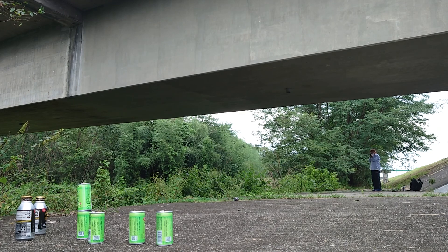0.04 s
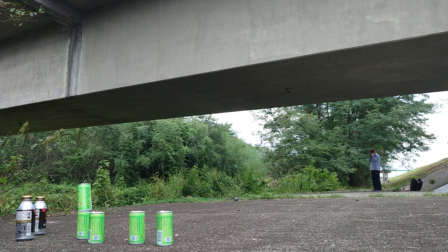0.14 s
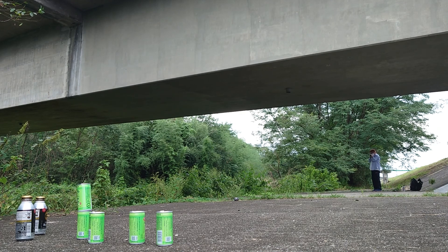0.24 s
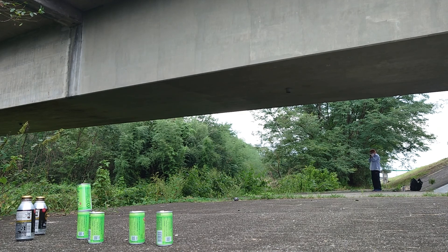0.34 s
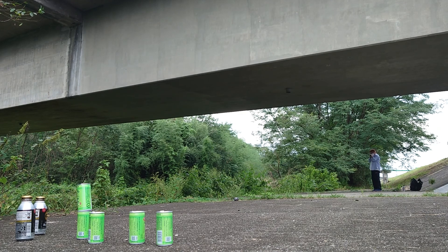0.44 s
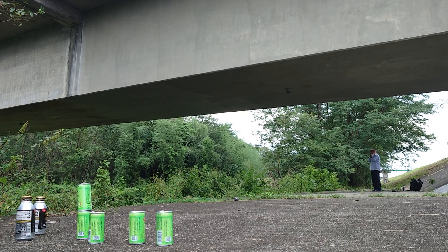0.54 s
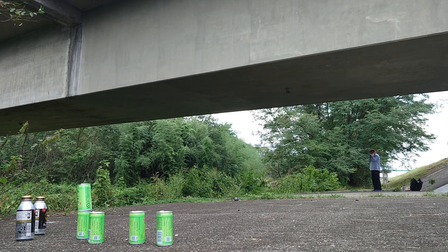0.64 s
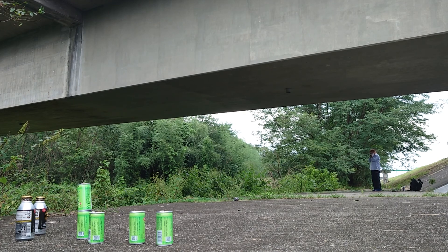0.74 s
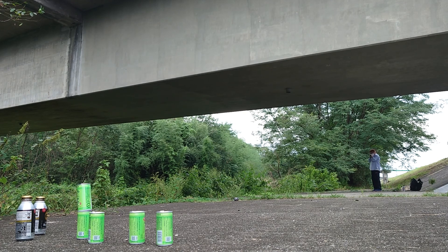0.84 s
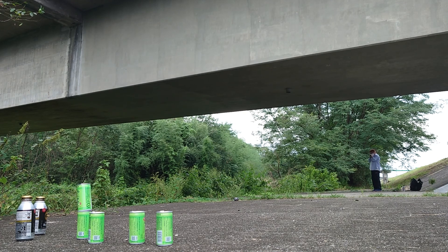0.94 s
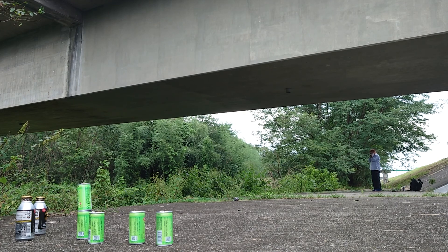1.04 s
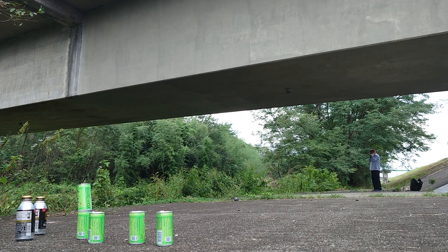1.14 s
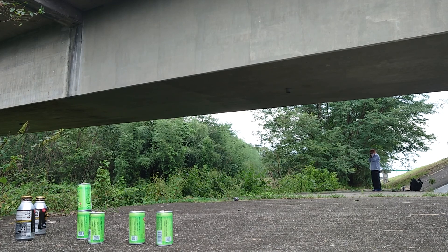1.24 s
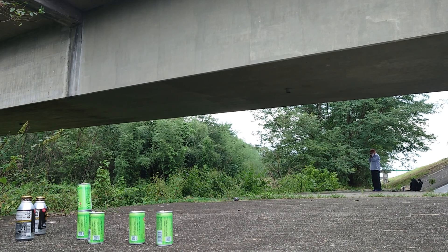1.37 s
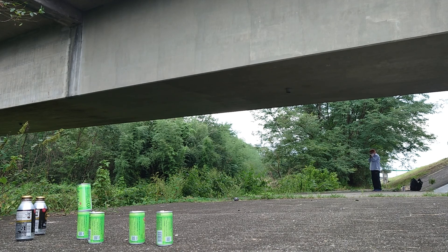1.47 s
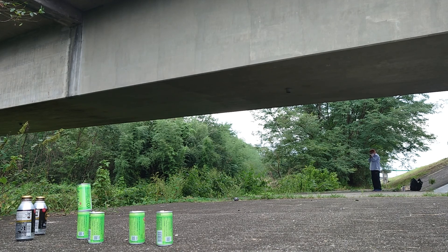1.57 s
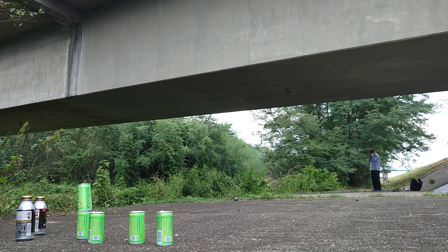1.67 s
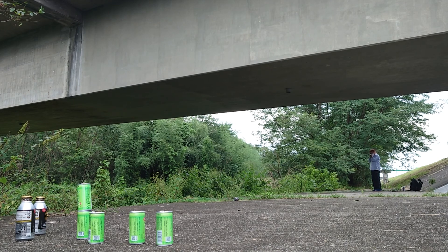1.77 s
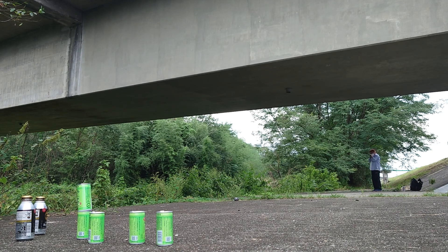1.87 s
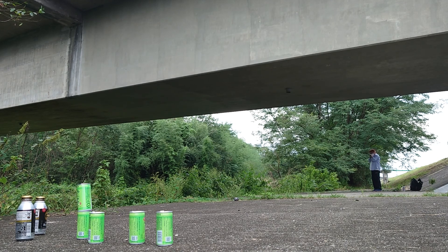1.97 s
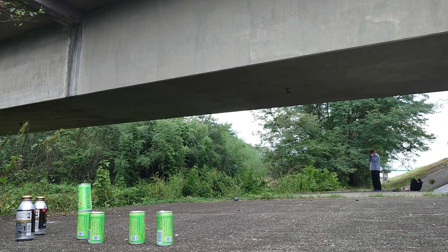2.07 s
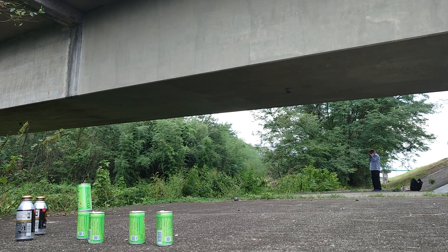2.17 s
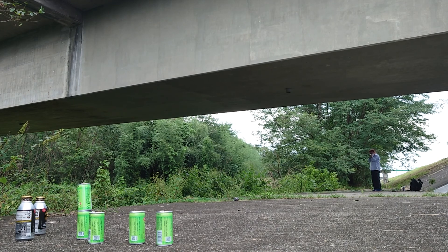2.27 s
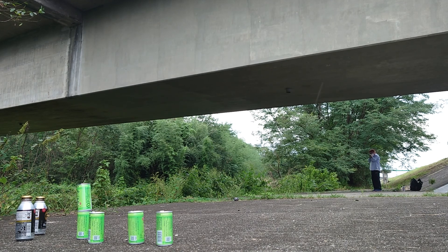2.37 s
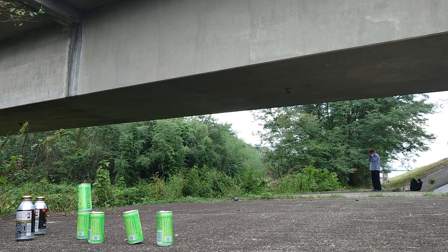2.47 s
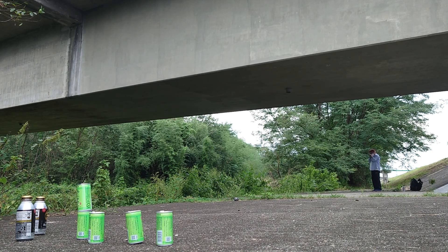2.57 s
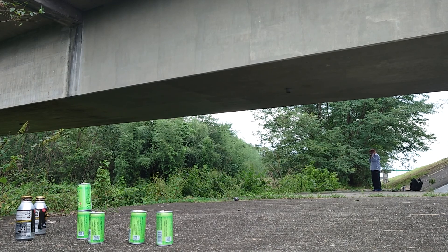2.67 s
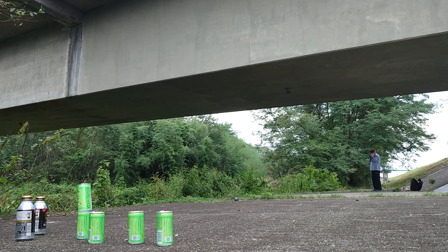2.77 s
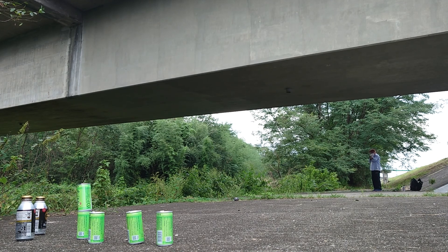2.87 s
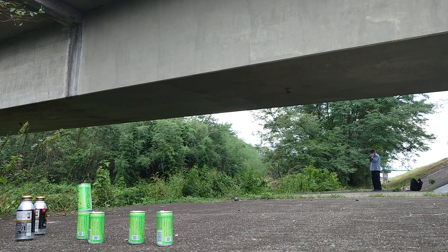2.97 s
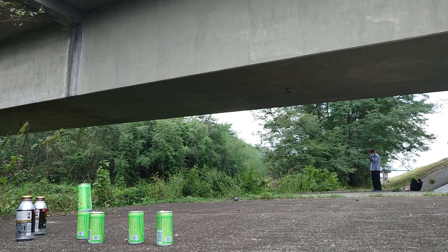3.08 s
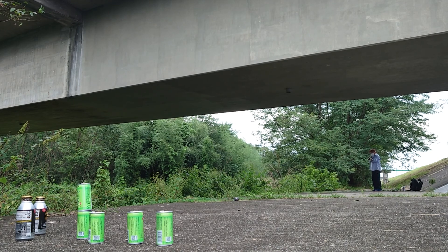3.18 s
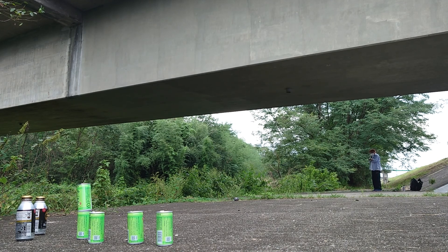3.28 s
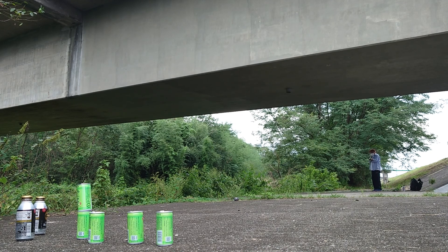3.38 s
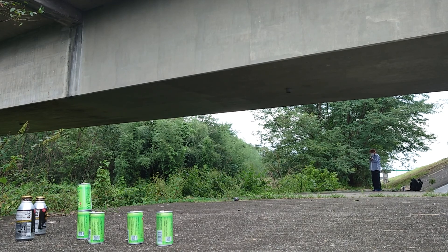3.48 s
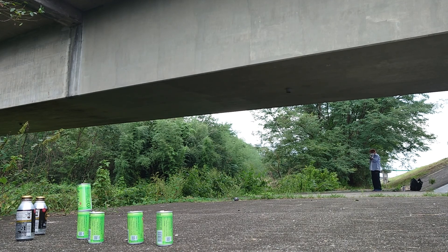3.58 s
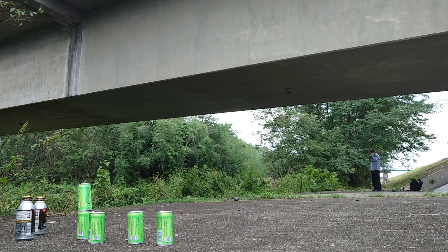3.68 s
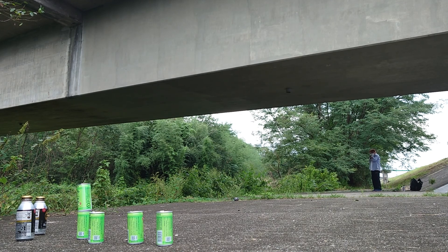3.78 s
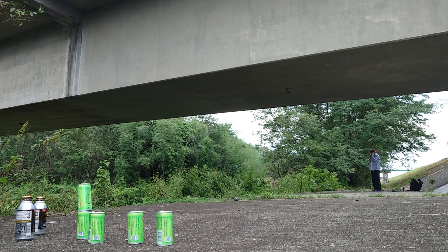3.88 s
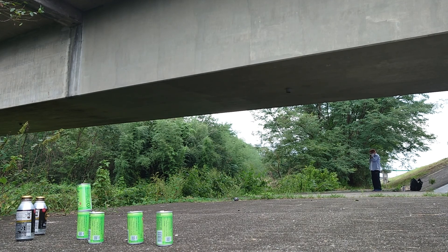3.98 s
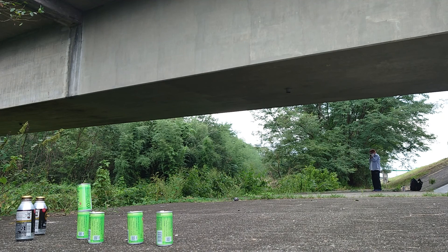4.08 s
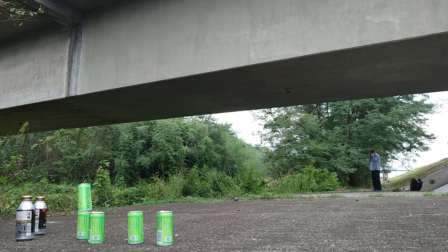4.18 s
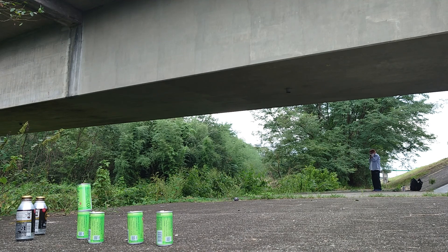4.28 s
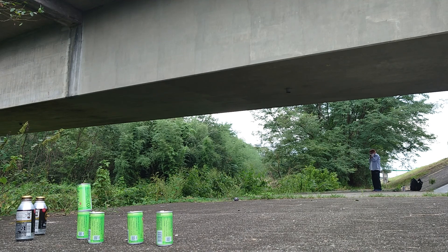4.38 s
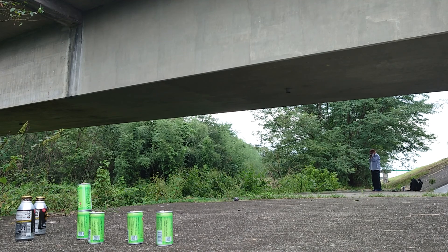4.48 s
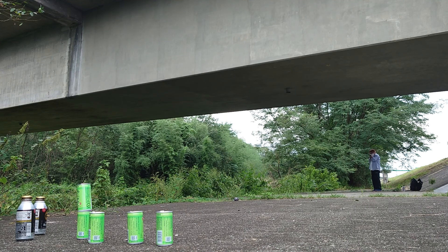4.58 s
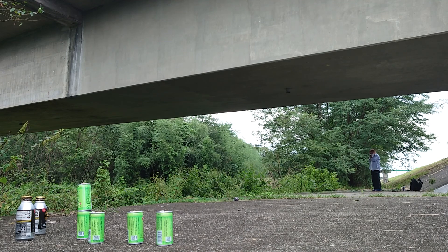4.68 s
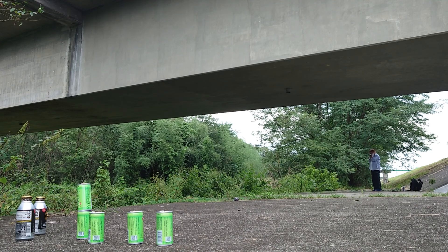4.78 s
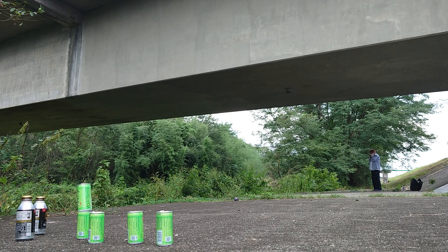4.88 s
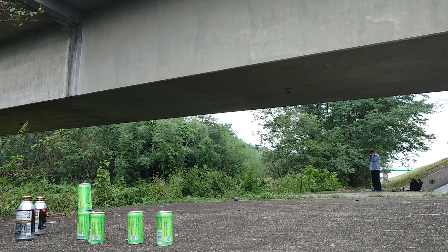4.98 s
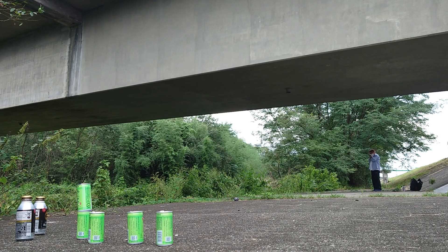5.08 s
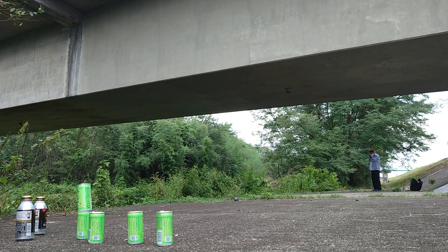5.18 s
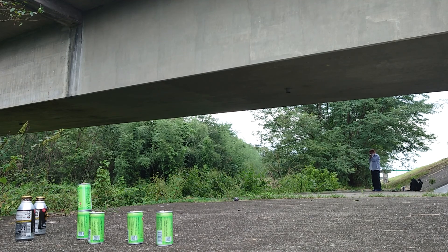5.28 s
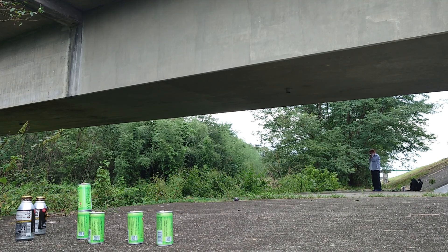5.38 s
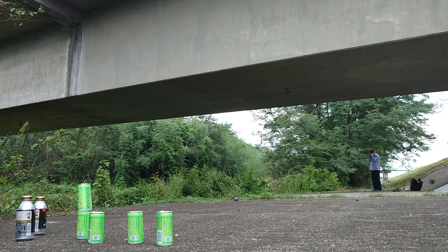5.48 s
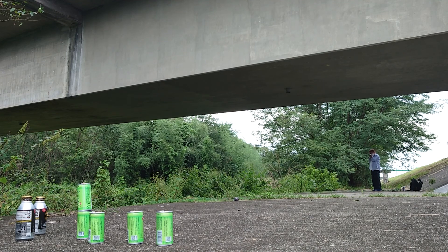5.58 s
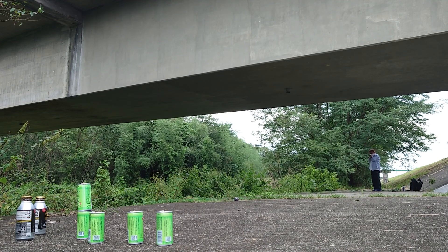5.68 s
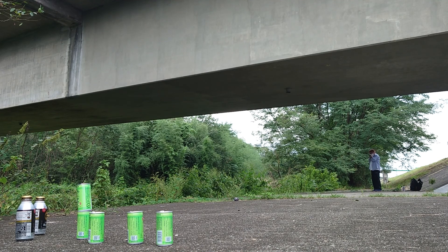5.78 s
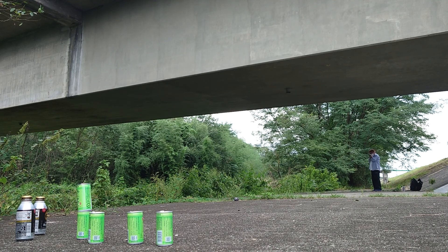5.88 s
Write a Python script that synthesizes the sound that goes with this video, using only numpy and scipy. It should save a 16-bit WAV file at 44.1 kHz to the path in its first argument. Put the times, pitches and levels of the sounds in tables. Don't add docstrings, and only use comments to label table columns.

```python
import sys
import numpy as np
from scipy import signal
from scipy.fft import rfft, irfft
from scipy.io import wavfile
from scipy.ndimage import uniform_filter1d

SR = 44100
rng = np.random.default_rng(int(sys.argv[2]) if len(sys.argv) > 2 else 0)


def persist_wave(psi):
    counts = np.round(np.clip(psi, -1, 1) * 32767).astype(np.int16)
    wavfile.write(sys.argv[1], SR, np.atleast_2d(counts).T)


def volts_from_db(level):
    exponent = np.asarray(level, float) / 20
    return 10 ** exponent


N = 261513

# [t/s, peak level/dB]
STRIKE = (2.4848, -2.5)
# [t/s, peak level/dB, then air column, oval and high modes against it/dB]
KNOCKS = [(2.7355, -23, -14, -12.5, -8.5), (2.7561, -22.5, -16, -14.5, -18), (2.768, -21, -11.5, -25, -7.5),
          (2.781, -23, -16.5, -20, -11.5), (2.847, -39.5, -12, -12, -23), (2.8944, -35, -9.5, -7.5, -9.5),
          (2.9878, -47.5, -6, -5, -12), (3.033, -46, -12, -10, -29), (3.0539, -34.5, -12, -5, -11),
          (3.064, -41, 0, -3.5, -10), (3.1155, -43.5, -5.5, -2, -23), (3.132, -38, -6, -7, -8),
          (3.183, -31.5, -10, -21, -12), (3.187, -30.5, -16, -2.5, -21), (3.199, -34, -7.5, -5, -12),
          (3.2535, -38, -3.5, -5, -10), (3.259, -35, -3.5, -15, -2.5), (3.3128, -42.5, -14, 2.5, -12),
          (3.331, -47.5, -8, 3, -1)]


def noise(size=N):
    return rng.standard_normal(size)


def unit(x):
    return x / np.sqrt(np.mean(x ** 2))


def colour(x, table, lo_hz=0.33, hi_hz=21600.0):
    size = 4096
    f = np.maximum(np.fft.rfftfreq(size, 1 / SR), 1)
    points_hz, points_db = np.transpose(table)
    db = np.interp(np.log(f), np.log(points_hz), points_db)
    db = db - 5 * np.log2(1 + (lo_hz / f) ** 8) - 5 * np.log2(1 + (f / hi_hz) ** 8)
    cep = irfft(np.maximum(db, -90) * np.log(10) / 20)
    cep[1:size // 2] *= 2
    cep[size // 2 + 1:] = 0
    return signal.fftconvolve(x, irfft(np.exp(rfft(cep))))[:len(x)]


def band(x, hz, width):
    edges = [hz - width / 2, hz + width / 2]
    return signal.sosfilt(signal.butter(2, edges, "band", fs=SR, output="sos"), x)


def walk(rate):
    k = int(SR / rate)
    held = np.repeat(noise(N // k + 1), k)
    return 1.3 * uniform_filter1d(uniform_filter1d(held, k), k)[:N]


def fade(t60, seconds):
    return 10 ** (-3 * np.arange(int(seconds * SR)) / SR / t60)


def onset(size, tau):
    return 1 - np.exp(-np.arange(size) / SR / tau)


def add(out, x, at):
    i = int(at * SR)
    out[..., i:i + x.shape[-1]] += x[..., :out.shape[-1] - i]


def pair(make, alike, left_late):
    shared = make()
    both = np.array([np.roll(shared, left_late), shared])
    return np.sqrt(alike) * both + np.sqrt(1 - alike) * np.array([make(), make()])


def delayed(x, samples):
    return np.r_[np.zeros(samples), x[:-samples]]


def ring(hz, t60, seconds, choke_s=9., choke_t60=.03, since=0.):
    t = np.arange(int(seconds * SR)) / SR
    damp = t / t60 + np.maximum(t - choke_s, 0) / choke_t60
    return np.sin(2 * np.pi * hz * (t + since)) * 10 ** (-3 * damp)


def gun():
    # [t/s, peak level/dB, tail level/dB, air burst level/dB]
    shots = [
        (2.277, -11.5, -16.5, -13),
        (3.76, -30, -12.5, -4),
    ]
    # [f/Hz, level per Hz/dB]
    shot_colour = [(88, -54), (150, 5), (555, -11), (821, 5), (1260, -1), (1500, 2), (3420, -10.5),
                   (3700, -6.5), (4410, -19), (4860, -3), (6020, -18), (8070, -9.5), (16000, -23)]
    # [f/Hz, level per Hz/dB]
    shot_tail = [(530, -33), (900, -11.5), (1250, -12.5), (1360, -14), (1990, -8), (2220, -13),
                 (2470, -9.5), (4920, -15), (6890, -22), (8150, -10.5), (16000, -33)]
    # [f/Hz, t60/s, level/dB]
    barrel = [(275, 0.074, -16), (420, 0.022, -9), (1490, 0.044, -6.5), (793, 0.035, -0.5),
              (1256, 0.021, -5.5), (1740, 0.027, -3.5), (2280, 0.019, 4.5), (3764, 0.11, -10.5),
              (4760, 0.017, -6)]
    # [delay/ms, level/dB]
    piston = [
        (0, -3.5),
        (1.3, 4.5),
        (3.4, -3),
        (5.6, -37),
        (8.2, -18),
    ]
    # [f/Hz, width/Hz, level against the tail/dB]
    deck = [(1800, 83, -11.5), (2225, 136, -3.5), (2720, 120, -10.5), (3710, 160, -13), (4860, 306, -12)]
    # [delay/s, level/dB]
    shot_echoes = [
        (.035, -17),
        (.072, -32),
        (.118, -31),
    ]

    out = np.zeros((2, N))
    body = sum((-1) ** k * volts_from_db(g) * ring(f, t60, .15) for k, (f, t60, g) in enumerate(barrel))
    size = len(body)
    tail_size, hiss_size = int(.7 * SR), 270
    for at, db, tail_db, air_db in shots:
        air = pair(lambda: unit(colour(noise(), shot_colour, 2470.0)), 0.94, left_late=9)[:, -size:]
        hiss = air[:, :hiss_size] * np.linspace(.3, 1, hiss_size)
        add(out, volts_from_db(db - 30) * hiss, at - hiss_size / SR)

        pop = volts_from_db(air_db) * air * fade(0.042, .15) * onset(size, 0.0019)
        for k, (ms, g) in enumerate(piston):
            blow = (-1) ** k * volts_from_db(g - 13.0) * body
            add(pop, np.array([volts_from_db(-3.0) * delayed(blow, 9), blow]), ms / 1000)
        add(out, volts_from_db(db) * pop, at + 0.0007)
        add(out, volts_from_db(db - 24) * pop, at + 0.021)
        for late, echo_db in shot_echoes:
            add(out, volts_from_db(db + echo_db) * signal.lfilter([1, -1], 1, pop), at + late)

        tail = pair(lambda: unit(colour(noise(tail_size), shot_tail)), 0.073, left_late=6)
        hollows = 0
        for hz, width, g in deck:
            hollow = pair(lambda: unit(band(noise(tail_size), hz, width)), .4, left_late=7)
            hollows = hollows + volts_from_db(g) * hollow
        tail = volts_from_db(-1.0) * tail + hollows * onset(tail_size, 0.049)
        tail = tail * fade(0.61, .7) * onset(tail_size, 0.00088)
        add(out, volts_from_db(db + tail_db - 11) * tail, at)
    return out


def strike():
    # [f/Hz, level/dB, t60/s]
    wall_modes = [(1187, -39.5, 1), (1477, -34, 0.52), (1555, -31, 2.1), (1718, -29, 1.9),
                  (1966, -27.5, 0.45), (2223, -29.5, 1.1), (2950, -10, 0.35), (3223, -15, 0.21),
                  (3044, -31, .4), (3220, -8, 0.08), (3130, -31, .5), (3280, -30, 0.44), (3440, -23, 0.27),
                  (3200, -30, .5), (3530, -35, 0.63), (3700, -35, 1.1), (3830, -33, .4), (3780, -19.5, 0.4),
                  (3800, -22, 0.05), (3920, -24, 0.75), (4355, -42, 0.63), (4662, -20, 0.25),
                  (4800, -35, 0.8), (2360, -41, 1.0), (2030, -40, .5), (5000, -34, 0.35), (5500, -44, 1.5),
                  (5900, -35, .5), (6950, -50, 1.0), (7434, -37, 0.15), (7714, -23.5, 0.3), (8300, -34, .9),
                  (8900, -43, 1.5), (10400, -30, .08), (11390, -35, .28), (12030, -41, .5)]
    # [f/Hz, level per Hz/dB]
    crack_colour = [(710, -52), (1200, -40), (1610, -23.5), (2620, -22.5), (2830, -12.5), (3220, -5.5),
                    (3550, -14.5), (4750, -16), (5970, -24.5), (11600, -17.5), (16000, -33)]
    # [f/Hz, level/dB]
    scatter_colour = [(1500, -16), (2600, -14), (3100, 7), (4500, -8), (6200, -11), (8000, -6),
                      (9500, -10.5), (12000, -16), (16000, -21)]
    # [delay/s, level/dB, length/s]
    pier_echoes = [
        (0.065, -36, 0.023),
        (0.101, -25.5, .035),
        (.18, -29, .05),
        (0.223, -32.5, 0.033),
    ]
    wobble_db, wobble_per_s = 2.5, 36

    at, db = STRIKE
    free = KNOCKS[0][0] - at
    splits = noise(len(wall_modes))
    wall = 0
    for k, (split, (f, g, t60)) in enumerate(zip(splits, wall_modes)):
        twin = ring(f, t60, .7, free, 0.52)
        twin = twin + 0.47 * ring(f * (1 + .002 * split), 1.2 * t60, .7, free, 0.18)
        wobble = wobble_db * walk(wobble_per_s)[:len(twin)] * (t60 > .2)
        wall = wall + (-1) ** k * volts_from_db(g + wobble) * twin
    wall = wall - volts_from_db(5.5) * ring(3260, 0.039, .7)
    wall = wall + volts_from_db(2.5) * ring(3040, 0.039, .7) + volts_from_db(-8.0) * ring(4470, 0.042, .7)
    add(wall, volts_from_db(-5.5) * ring(3230, 0.06, .1), .009)
    wall = wall + volts_from_db(-37.5) * ring(510, 0.5, .7, free) + volts_from_db(-48.0) * ring(856, 0.61, .7, free)
    for hz, db_off in zip(rng.uniform(2850, 7500, 70), rng.uniform(-12, 0, 70)):
        mode_db = db_off - 31.5 - 6.4 * np.log2(hz / 3000)
        wall = wall + volts_from_db(mode_db) * ring(hz, 1.0, .7, free, 0.32)

    size = len(wall)
    crack = pair(lambda: unit(colour(noise(size), crack_colour, 1300.)), 0.47, left_late=-2)
    crack = crack * (volts_from_db(5.0) * fade(0.041, .7) + volts_from_db(-12.5) * fade(0.18, .7))
    scatter = pair(lambda: unit(colour(noise(size), scatter_colour)), 0.17, left_late=-4)
    linger = volts_from_db(-28.5) * fade(5.8, .7) * np.linspace(1, 0, size)
    scatter = scatter * (volts_from_db(-27.5) * fade(0.5, .7) + linger)
    for late, echo_db, length in pier_echoes:
        hump = np.hanning(int(2 * length * SR))
        echo = pair(lambda: unit(colour(noise(len(hump)), scatter_colour, 4100.0)), 0.27, left_late=-2)
        add(scatter, volts_from_db(echo_db) * hump * echo, late - length)

    sides = np.array([volts_from_db(0.5) * wall, delayed(wall, 5)])
    out = np.zeros((2, N))
    add(out, volts_from_db(db - 17) * onset(size, .0008) * (sides + crack + scatter), at)
    return out


def rocking():
    # [f/Hz, t60/s, level/dB]
    body_modes = [
        (1184, 0.31, -1),
        (511.5, 0.23, 2),
        (860, 0.23, -2),
        (1950, 0.11, 1),
        (2345, 0.47, -7),
    ]
    # [f/Hz, t60/s, level/dB]
    rim_modes = [(3300, 0.054, -20), (6420, .04, -22.5), (9070, 0.044, -23.5), (11460, .05, -24),
                 (15200, .05, -30)]
    settle_s, top_settle_s = 2.4, 0.61
    roll_dull_db = -7.5
    top_fade_db_per_s = -12
    rebound_db = -6
    grit_db = -23.5
    chatter_db, chatter_per_s = 1.68, 70

    out = np.zeros(N)
    times = [row[0] for row in KNOCKS]
    top_hz = body_modes[-1][0]
    ends = times[1:-1] + [t + .003 for t in times[-2:]]
    for (at, db, air_db, oval_db, high_db), last, end in zip(KNOCKS, [0] + times, ends):
        rolled = at - last < .015
        since = at - times[0]
        free = end - at
        high_db = high_db + roll_dull_db * rolled
        top_db = high_db - roll_dull_db * rolled + top_fade_db_per_s * since
        tone = 0
        for r, (f, t60, g) in zip([0, air_db, oval_db, high_db, top_db], body_modes):
            settled = np.exp(-since / (top_settle_s if f == top_hz else settle_s))
            tone = tone + volts_from_db(r + g) * ring(f, t60 * settled, .4, free, 0.019, since)
        tone = tone + volts_from_db(air_db - 6.0) * ring(465, 0.39, .4, free, 0.025, since)
        tone = tone + volts_from_db(-16.0) * ring(1015, 0.052, .4, free, 0.024, since)
        tone = tone * (0.39 + 0.47 * fade(0.2, .4))
        tone = tone * onset(len(tone), .003 if rolled else .0004)

        thud = volts_from_db(-15.5) * unit(band(noise(len(tone)), 810, 780))
        thud = thud * (fade(0.016, .4) + volts_from_db(-12.0) * fade(0.27, .4))
        thud = thud + volts_from_db(grit_db) * unit(band(noise(len(tone)), 2350, 2400)) * fade(0.38, .4)
        for f, t60, g in rim_modes:
            thud = thud + volts_from_db(g + 2.1 * (db + 24.0)) * ring(f, t60, .4)
        thud = (not rolled) * volts_from_db(rebound_db * (at - last < .022)) * thud
        add(out, volts_from_db(db) * (tone + thud), at)
    add(out, volts_from_db(-48) * ring(top_hz + 4, 1.43, .7), times[1])
    out = out * volts_from_db(chatter_db * walk(chatter_per_s))
    return np.array([out, delayed(out, 4)])


def ticks():
    # [t/s, peak level/dB, 3-6 kHz part/dB]
    single_ticks = [(2.8095, -54, 14), (2.8828, -49.5, 11), (2.8958, -45, -5), (3.0924, -58, 15),
                    (3.4885, -49.5, 8.5), (3.695, -40.5, 0.5), (3.8023, -44, 7.5), (4.6799, -54.5, 0),
                    (4.9312, -58, -5), (5.021, -56, -20), (5.2824, -53.5, 9), (5.4794, -59, -7),
                    (5.5662, -67, -6.5), (5.721, -52.5, -6), (5.733, -47, -5), (5.7709, -43.5, -21)]
    # [t/s, peak level/dB, 3-6 kHz part/dB,
    # earlier click against it/dB]
    doubles = [(2.1007, -54.5, -6, -14), (3.2147, -39, 1.5, -5), (3.608, -48, 2, -6),
               (4.0363, -50.5, 5, -3), (4.238, -51, -9, -12), (4.439, -64, -4, 8), (4.782, -46.5, -8, -10),
               (5.1736, -53.5, 9, -4)]
    # [t/s, peak level/dB, 3-6 kHz part/dB]
    skips = [
        (2.4599, -34, -4),
        (2.8284, -38, -12),
    ]
    # [t/s, peak level/dB, 3-6 kHz part/dB, length/ms]
    scuffs = [(2.477, -56, -15, .6), (3.312, -52.5, 13.5, 5.9), (3.329, -45, 8, 3.2),
              (3.335, -41, 7.5, 4.1), (3.449, -41, 4, 2.2), (3.673, -49, 1, 4.1), (3.679, -44.5, -1, 4.5),
              (3.687, -44.5, 4, 2.4), (3.785, -44.5, 7, 5.4), (5.188, -54, -8, 3), (5.726, -51, -7, 14)]
    # [f/Hz, level/dB]
    tick_colour = [(4500, -19.5), (6000, -27), (7800, 8), (9500, -1.5), (12000, -7), (15500, -11)]
    # [f/Hz, level/dB]
    skip_colour = [(4500, -10), (6500, -6), (8000, -7), (12000, -1), (16000, -8)]
    # [t/s, peak level/dB, f/Hz, t60/s]
    clink = (3.4505, -49, 3740, .04)
    first_ahead_s, tick_ms, skip_ms = 0.014, 2.7, 0.93
    tick_pan_db, skip_pan_db, scuff_pan_db = -20, -10, -10

    size = 4000
    t = np.arange(size) / SR
    click = 1. * (np.arange(size) == 36)
    soft, hard = colour(click, tick_colour), colour(click, skip_colour)
    soft, hard = soft / np.abs(soft).max(), hard / np.abs(hard).max()

    grit = [*single_ticks]
    for at, db, low_db, first_db in doubles:
        grit += [(at, db, low_db), (at - first_ahead_s, db + first_db, low_db)]
    rows = [(*row, skip_ms, skip_pan_db, volts_from_db(22) * hard) for row in skips]
    rows += [(*row, scuff_pan_db, volts_from_db(-8) * soft) for row in scuffs]
    rows += [(*row, tick_ms, tick_pan_db, volts_from_db(10) * soft) for row in grit]

    out = np.zeros((2, N))
    for at, db, low_db, ms, pan_db, snap in rows:
        bright = pair(lambda: unit(colour(noise(size), tick_colour)), 0.13, left_late=4)
        low = pair(lambda: unit(band(noise(size), 3900, 4000)), 0.54, left_late=8)
        tau = ms / 1000
        crumble = 2 * onset(size, .5 * tau) * np.exp(-t / tau)
        shape = crumble + volts_from_db(-15.0) * np.exp(-t / 0.099)
        bright = bright * shape + np.array([np.roll(snap, 4), snap])
        sides = volts_from_db([[pan_db + 5.5], [0]])
        add(out, volts_from_db(db - 3.0) * (sides * bright + volts_from_db(low_db - 8.5) * low * shape), at)
    clink_s, clink_db, clink_hz, clink_t60 = clink
    add(out, volts_from_db(clink_db) * ring(clink_hz, clink_t60, .06), clink_s)
    return out


def birds():
    # [t/s, length/s, from f/Hz, to f/Hz, level/dB]
    glides = [(.07, 0.047, 2600, 3260, -65), (0.105, 0.052, 3260, 1950, -62),
              (0.632, 0.032, 3300, 2630, -71), (1.42, 0.055, 4060, 3600, -66),
              (1.615, .025, 6500, 5800, -66), (1.65, .03, 5540, 4680, -72), (1.817, .045, 7200, 5700, -62),
              (3.115, .042, 7300, 5700, -61), (5.134, 0.058, 1910, 3800, -52),
              (5.192, 0.014, 3880, 3780, -47.5), (5.197, .033, 3400, 1790, -52.5),
              (5.205, .022, 3780, 3720, -61), (5.24, .022, 3860, 3770, -58), (5.285, .02, 3730, 3700, -62),
              (5.245, 0.036, 2780, 2720, -73)]
    rise_bend, fall_bend = 2.6, 1.82
    low_fade_db_per_octave, call_edge_s = -17.5, 0.0047

    out = np.zeros(N)
    for at, length, from_hz, to_hz, db in glides:
        u = np.linspace(0, 1, int(length * SR))
        top, drop = max(from_hz, to_hz), abs(from_hz - to_hz)
        bend = (1 - u) ** rise_bend if to_hz > from_hz else u ** fall_bend
        hz = top - drop * bend
        edge = np.clip(np.minimum(u, 1 - u) * length / call_edge_s + .5, 0, 1)
        loudness = volts_from_db(db - 2.5 + low_fade_db_per_octave * np.log2(top / hz))
        add(out, edge * loudness * np.sin(2 * np.pi * np.cumsum(hz) / SR), at)

    def smear():
        scatter = volts_from_db(-30) * noise(6615) * fade(.3, .15)
        return signal.fftconvolve(out, np.r_[1, scatter])[:N]

    return pair(smear, 0.48, left_late=-18)


def swell(rows, floor_db):
    t = np.arange(N) / SR
    humps = 0
    for at, db, length in rows:
        humps = humps + volts_from_db(2 * db) * np.cos(np.pi * np.clip((t - at) / length, -.5, .5)) ** 2
    return 10 * np.log10(humps + volts_from_db(2 * floor_db))


def road():
    # [f/Hz, level per Hz/dB]
    road_colour = [(13, -32), (22, -9), (43, -21.5), (65, -1.5), (117, -2), (141, -10.5), (173, -11),
                   (366, -22), (398, -20.5), (511, -20.5), (630, -21.5), (1330, -32.5), (1680, -31),
                   (2070, -35), (3200, -54.5), (4160, -76), (7040, -120)]
    # [t/s, level/dB, length/s]
    axles = [(.19, -45, 0.45), (.62, -43.5, 0.43), (1.0, -47.5, 0.37), (1.2, -43, 0.22),
             (1.58, -48.5, 0.63), (2.05, -51, 0.31), (2.35, -46.5, 0.25), (2.83, -45.5, 0.22),
             (3.01, -46, 0.18), (3.38, -44.5, 0.18), (3.72, -49.5, 0.22), (4.02, -41, 0.28),
             (4.53, -45.5, 0.26), (4.92, -43, 0.4), (5.2, -51, 0.3), (5.58, -43, 0.56), (5.83, -44, 0.34)]
    # [t/s, level/dB, length/s]
    bumps = [
        (.01, -52.5, 0.066),
        (2.2, -57.5, 0.16),
        (5.25, -53, 0.14),
    ]
    # [f/Hz, width/Hz, level against tyres/dB]
    whine_band = (1680, 160, -9)
    upper_db, upper_follows, upper_db_per_s = 5, 0.28, -1.5
    drone_db, drone_db_per_s = -57.5, -0.196
    tyre_db, tyre_db_per_s = -60.5, -1.5

    def layer(lo, hi):
        return unit(colour(noise(), road_colour, lo, hi))

    t = np.arange(N) / SR
    load = swell(axles, -54)
    upper = load.mean() + upper_db + upper_follows * (load - load.mean()) + upper_db_per_s * t
    rumble = pair(lambda: layer(1., 92.3), 0.91, left_late=-8) * volts_from_db(load + 0.47 * walk(11.0))
    hum = pair(lambda: layer(93.5, 227.0), 0.88, left_late=-13) * volts_from_db(upper + 0.83 * walk(12))
    drone_level = swell(bumps, drone_db + drone_db_per_s * t) + 1.5 * walk(16)
    drone = pair(lambda: layer(246.0, 990.0), 0.75, left_late=-17) * volts_from_db(drone_level)
    whine_hz, whine_width, whine_db = whine_band
    whine = unit(band(noise(), whine_hz, whine_width)) * volts_from_db(whine_db + 1.9 * walk(10.4) - 5 * t)
    tyres = pair(lambda: layer(910.0, 9000.), 0.77, left_late=-17) + whine
    tyres = tyres * volts_from_db(tyre_db + tyre_db_per_s * t + walk(8.6))
    return (rumble + hum) * volts_from_db(0.99 * duck()) + drone + tyres


def bushes():
    # [f/Hz, width/Hz, left level/dB, right level/dB]
    insects = [(4368, 710, -63, -63.5), (3600, 380, -100, -75), (7764, 780, -67, -63.5),
               (6740, 590, -75.5, -78)]
    # [f/Hz, level/dB]
    leaf_colour = [(2500, -0.5), (3200, 6.5), (5600, 2), (9000, 5.5), (10500, -6), (12500, -1),
                   (15500, 3.5)]

    leaf_level = -71.5 + 0.38 * np.arange(N) / SR + walk(3.95)
    out = np.array([unit(colour(noise(), leaf_colour, 2560.0)) for _ in range(2)]) * volts_from_db(leaf_level)
    for hz, width, *sides_db in insects:
        for side, db in enumerate(sides_db):
            chorus = unit(band(band(noise(), hz, width), hz, 1.9 * width))
            out[side] += volts_from_db(db + 0.98 * walk(11)) * chorus
    return out


def duck():
    duck_db, creep_db_per_s = -14, 39
    ahead_s, attack_s, hold_s, release_s = 0.0101, 0.0056, 0.16, .02
    t = np.arange(N) / SR - STRIKE[0] + ahead_s
    attack = np.clip(t / attack_s, 0, 1)
    release = np.clip(1 - (t - attack_s - hold_s) / release_s, 0, 1)
    return attack * release * (duck_db + creep_db_per_s * t)


def scene():
    far = (road() + bushes() + birds() + gun()) * volts_from_db(duck())
    return far + strike() + rocking() + ticks()


def roll_off(x):
    return signal.sosfilt(signal.butter(12, 16830, fs=SR, output="sos"), x)


def record(dry):
    # [f/Hz, gain/dB]
    left_mic = [(1500, 1), (3000, -0.5), (4300, 1), (5400, -7), (7700, -11), (8800, -23), (10000, -8.5),
                (12000, -3), (16000, 0)]
    hiss = volts_from_db(-81.5) * unit(band(noise(), 10500, 1800))
    left = colour(dry[0], left_mic) * volts_from_db(2.5) + hiss
    right = signal.lfilter(*signal.butter(1, 75, "high", fs=SR), dry[1]) * volts_from_db(3.5)
    top = signal.ellip(10, .2, 60, 16050, fs=SR, output="sos")
    mix = signal.sosfilt(top, np.array([left, right]))
    return roll_off(mix)


dry = scene()
out = record(dry)
persist_wave(out)
```